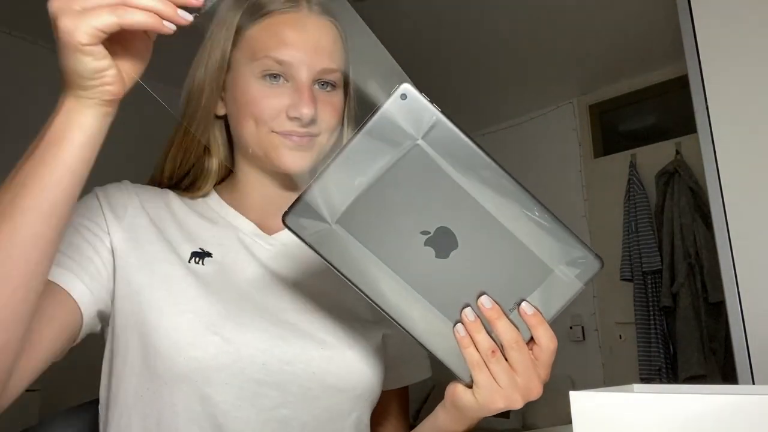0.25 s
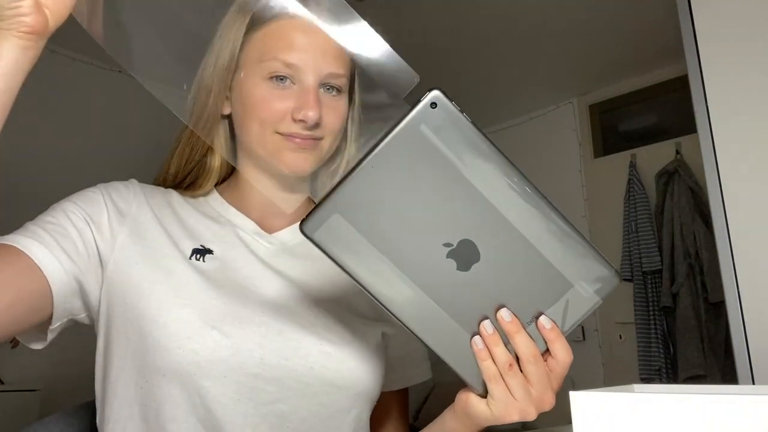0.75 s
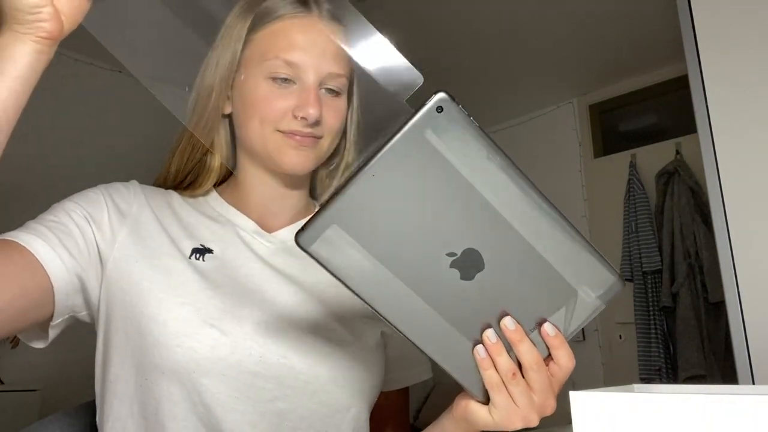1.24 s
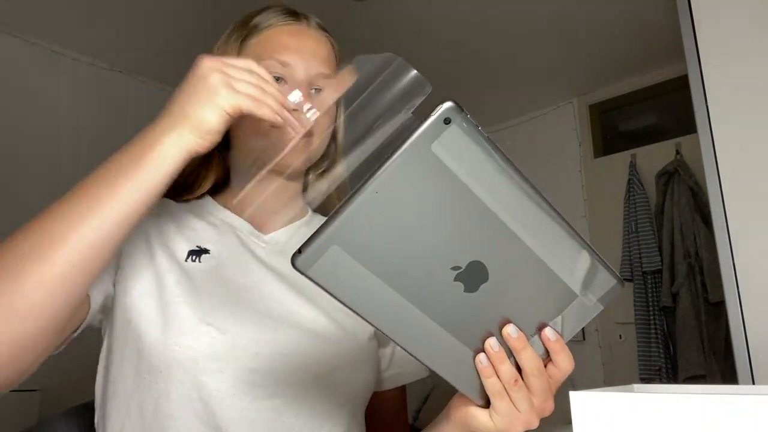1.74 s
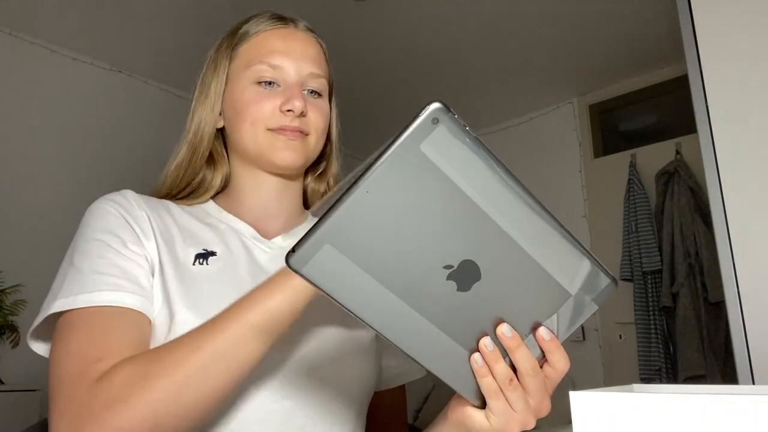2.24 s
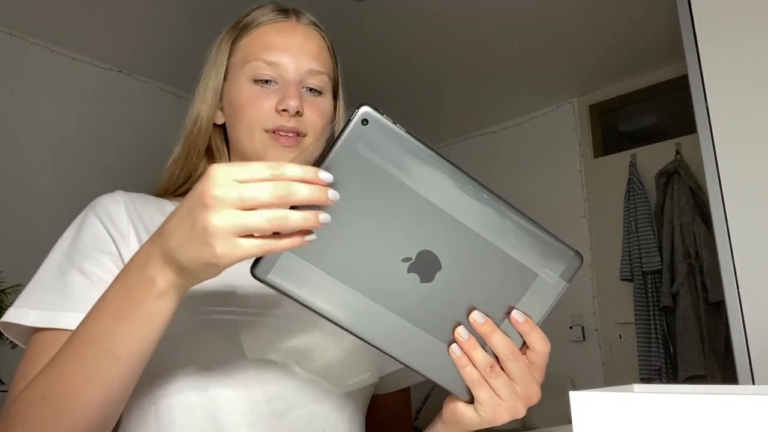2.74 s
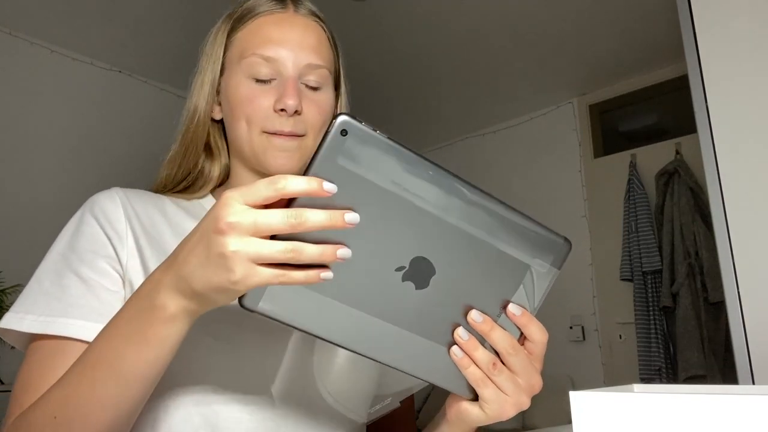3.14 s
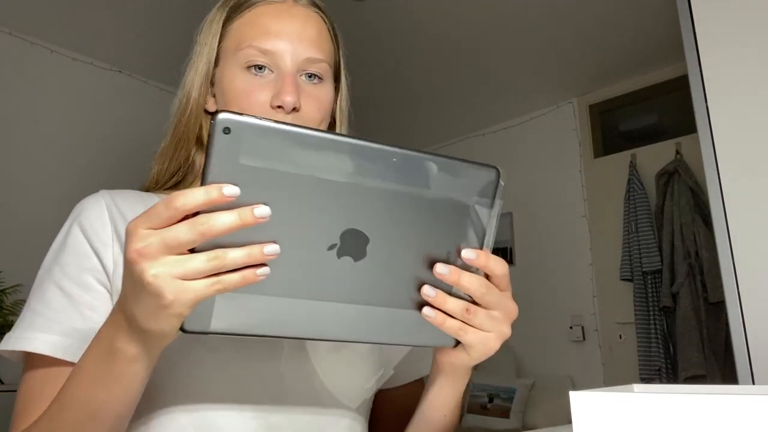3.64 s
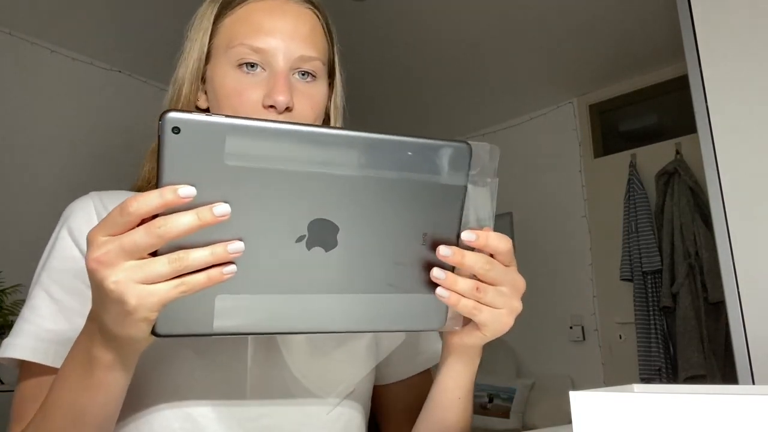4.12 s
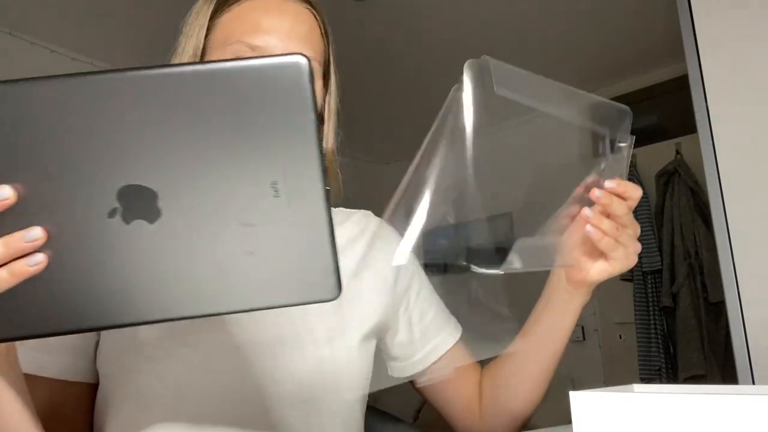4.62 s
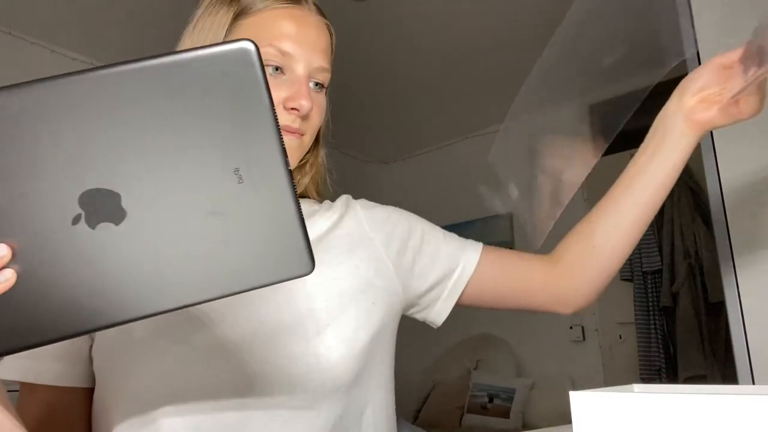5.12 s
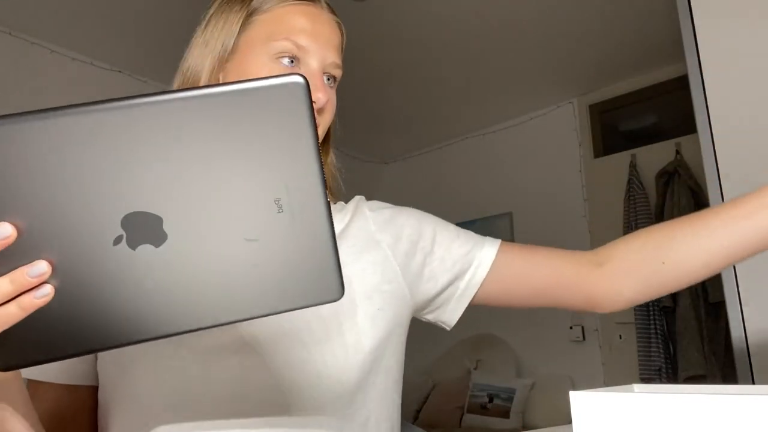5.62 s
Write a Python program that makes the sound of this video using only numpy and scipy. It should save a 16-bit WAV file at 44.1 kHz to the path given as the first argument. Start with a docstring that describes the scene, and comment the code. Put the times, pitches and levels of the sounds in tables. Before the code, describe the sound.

A dry, bright hiss of film on a smooth casing opens the scene and bursts into a sharp, booming crackle. Fingers then handle the sheet quietly: little pops, knocks, rustles. Short pushing scrapes build until the wrapper slips off with a thin sizzle, and loose plastic crackles off to the right. Close stereo pickup, small indoor room, faint steady air.

```python
"""A thin plastic wrapper is pulled off a tablet in a small room, close to the microphone.
Over quiet air, the film first hisses along the casing: a dense stream of tiny random slips, given a colour.
It flaps free with a loud crackle (a burst of many slips) and a boom (low fading swings). Handling then brings
single snaps (a noisy crack and a pitched pop), crinkles, taps and pushes of the casing in its sleeve. At last
the casing leaves the other end with a sizzle, the film slips free and is tossed aside, still crinkling."""
import sys
import numpy as np
from scipy import signal
from scipy.fft import rfft, irfft, next_fast_len
from scipy.io import wavfile
from scipy.ndimage import uniform_filter1d, map_coordinates

SR = 44100
rng = np.random.default_rng(int(sys.argv[2]) if len(sys.argv) > 2 else 0)


def generate_wav(sig):
    """Save sig (samples, or channels by samples) to the path in sys.argv[1] as 16-bit PCM at SR."""
    pcm = np.round(np.clip(np.atleast_2d(sig).T, -1, 1) * 32767).astype(np.int16)
    wavfile.write(sys.argv[1], SR, pcm)


N = 258588
TIME = np.arange(N) / SR

# Colour of the quiet air: pitch_hz, level_db
AIR_COLOUR = [(20, -33), (45, 5.5), (100, -6), (350, -15), (520, -20.5), (4000, -35.5), (13500, -35),
              (15000, -48.5)]
# Colours of film on casing, and of casing inside the sleeve: pitch_hz, level_db
HISS_COLOUR = [(100, -4.5), (400, -6.5), (500, -8), (720, 0), (960, -6.5), (1290, -12.5), (1900, 1),
               (3000, -10.5), (4300, -0.5), (5100, -5.5), (7500, -1.5), (14000, -11), (15200, -39.5)]
SLEEVE_COLOUR = [(150, -17), (350, -4.5), (600, 8.5), (1100, -6.5), (1800, 2), (5000, 3), (9000, 7),
                 (14000, 2), (15200, -24)]
# The film scrapes over an end of the casing: start_s, length_s, level_db (before the swell)
PULLS = [(-.05, .61, -47), (4.447, 0.082, -47.5)]
# The casing slides along inside the sleeve: start_s, length_s, level_db (before the swell)
PUSHES = [(1.378, 0.039, -58), (1.539, 0.079, -65), (2.332, 0.045, -69.5), (3.107, 0.16, -67),
          (3.475, 0.14, -59.5), (3.615, 0.08, -47), (3.73, 0.226, -66), (3.936, 0.278, -45.5),
          (4.198, 0.074, -47), (4.29, 0.2, -43)]
# The end of the casing leaves the sleeve, a thin sizzle: start_s, length_s, level_db (before the swell)
SIZZLE = (4.235, 0.074, -40.5)
# Low rumbles as the grip drags: start_s, length_s, level_db (before the swell)
DRAGS = [(0.224, 0.15, -59), (3.348, 0.17, -59)]
# The whole sheet booms as it flaps free: pitch_hz, level_db (before the shiver), t60_s (time to fall 60 dB)
FLAP_BOOM = [(61.3, -18.5, 0.24), (134.7, -25, 0.3), (203, -29, 0.36), (253.4, -30, 0.47)]
# Dull knocks of hands and casing: start_s, level_db (before the shiver), settled pitch_hz
KNOCKS = [(0.585, -35, 131), (.834, -38.5, 124.7), (1.622, -37, 79.7), (2.009, -34, 240), (2.656, -40, 100),
          (2.702, -50, 111), (3.696, -51.5, 182), (4.219, -27.5, 200.3)]
# The sheet buckles: start_s, pop level_db, crack_db (relative to the pop), average pop pitch_hz
SNAPS = [(0.5846, -41.5, 1.5, 705), (.601, -55.5, 15, 815), (.658, -39, 1, 556), (1.397, -75.5, -6.5, 1450),
         (1.481, -82.5, -9, 4310), (1.6183, -57.5, 1, 636), (1.6285, -55.5, -16, 695),
         (1.6806, -61, 1, 810), (2.0075, -49.5, -5.5, 613), (2.011, -52, -2, 444),
         (2.063, -63.5, -20, 1780), (2.198, -68.5, -0.5, 1060), (2.912, -81, -9, 4470),
         (3.48, -78, -4.5, 657), (3.4965, -88, 11, 2470), (3.542, -73.5, -8, 1740),
         (3.647, -74.5, 8.5, 770), (3.69, -69.5, -3, 740), (3.7, -62, -14.5, 672), (3.793, -74, 4, 634),
         (3.9428, -75.5, 10, 2500), (3.9517, -48.5, -3.5, 1271), (4.206, -54.5, -22, 720),
         (4.215, -46, -5.5, 670), (4.353, -60.5, -9, 1300), (4.935, -71.5, -16, 3240), (5.559, -77, 0, 695),
         (5.639, -53, -16, 2760), (5.651, -57, 11, 1450), (5.722, -50, -4.5, 2490), (5.843, -59, -8, 830)]
# Colour of a snap's crack: pitch_hz, level_db
CRACK_COLOUR = [(200, -9.5), (1000, -3), (2500, 5), (5000, -1.5), (9000, 0.5), (13000, -6), (16000, -12.5)]
# The film is stretched over the casing: start_s, end_s
TAUT_SPAN = (3.4, 4.4)
# Many creases give way together: start_s, length_s, crackle_db, flutter_db
CRUMPLES = [(.587, 0.033, -38.5, -28.5), (0.6388, 0.033, -19.5, -20.5), (0.915, 0.022, -66, -55.5),
            (1.622, 0.018, -51, -33.5), (2.013, 0.026, -53.5, -56), (2.197, 0.045, -59, -61),
            (4.214, 0.021, -59, -44), (4.291, 0.203, -60.5, -55.5), (4.512, 0.011, -48.5, -58),
            (4.931, 0.037, -70, -64.5), (5.627, 0.038, -42.5, -42.5), (5.679, 0.066, -54, -52.5),
            (5.797, 0.022, -50.5, -50)]
# Colours of the crackling creases and the fluttering sheet: pitch_hz, level_db
CRACKLE_COLOUR = [(150, -36), (600, 3), (1300, -9.5), (2200, -1.5), (4200, -2), (8000, -5.5), (12000, -8.5),
                  (14300, -19.5), (15500, -40.5)]
FLUTTER_COLOUR = [(40, -14), (110, 3), (215, 6), (380, -3), (600, 0), (1000, -6), (1500, -15),
                  (4000, -54.5)]
# A hard object close by is jolted: start_s, level_db
JOLTS = [(.66, -55), (2.01, -72.5), (2.88, -65), (4.87, -67)]
# Soft taps and dull crinkles under the fingers: start_s, level_db, pitch_hz
TAPS = [(1.343, -76.5, 1000), (1.809, -72.5, 941), (1.867, -73.5, 1630), (2.459, -68.5, 1578),
        (2.472, -65, 783), (2.786, -68.5, 750), (2.848, -75, 1210), (2.903, -71, 784), (4.32, -62.5, 780),
        (4.952, -66, 1157), (5.279, -79, 2250), (5.365, -78, 1376)]
# Fingers shift and the loose sheet sways: middle_s, half_length_s, level_db, resonance pitch_hz
RUSTLES = [(1.409, 0.033, -61, 450), (1.597, 0.023, -63.5, 897), (1.898, 0.099, -59.5, 304),
           (2.048, 0.04, -51.5, 3600), (2.224, 0.033, -51, 1560), (2.429, 0.14, -65.5, 677),
           (2.867, 0.065, -58, 411), (3.221, 0.18, -74, 595.5), (4.276, 0.065, -53, 299),
           (4.556, 0.038, -56, 175.7), (4.871, 0.037, -65, 335.4), (5.68, 0.045, -42, 1400),
           (5.79, 0.036, -48.5, 1020)]
# Colour of the broad part of a rustle: pitch_hz, level_db
RUSTLE_COLOUR = [(100, 10.5), (380, 10.5), (800, -0.5), (2500, -8), (10000, -42)]
# How long the room rings: pitch_hz, t60_s (time to fall 60 dB)
ROOM_FADE = [(100, 0.21), (300, 0.37), (1000, 0.26), (4000, 0.28), (8000, 0.25), (15000, 0.075)]
# How alike left and right are in sound from all sides: pitch_hz, likeness (-1 opposite, 1 the same)
LIKENESS = [(120, .99), (230, .9), (400, .2), (600, -.6), (1100, .2), (1600, 0), (5500, 0), (8000, .7)]
# Extra lead of the side nearer to the source: pitch_hz, lead_radians
NEAR_LEAD = [(260, 0), (345, .7), (430, 1.5), (600, 3.6), (860, 4.8), (1050, 5.9), (1300, 6.8),
             (2000, 6.28)]
# The recorder turns the treble of left against right, whatever its direction: pitch_hz, turn_radians
TREBLE_TURN = [(5000, 0), (6600, 1.4), (8000, 0), (10500, -3.14), (13200, -6.28), (15000, -9.42)]

# Movements: onset, time to fall 60 dB afterwards, and how much each kind grows
ATTACK_S, RELEASE_T60_S, PULL_SWELL_DB, PUSH_SWELL_DB = 0.014, 0.017, 1.5, 4
# The film's free end: starting pitch, rise as a share of it, band width, level relative to the pull
EDGE_HZ, EDGE_RISE, EDGE_WIDTH_HZ, EDGE_DB = 2300, 0.4, 350, -17
SIZZLE_LOW_HZ = 8100
DRAG_HZ, DRAG_WAVER_HZ = 50, 7.6
FLAP_S = 0.653  # the film comes free of the first end
KNOCK_T60_S = 0.11
KNOCK_SAG, KNOCK_SAG_S = 0.86, 0.0042  # starts sharp by this share of its pitch, then falls to it
SHIVER_DB = 6.5  # the swings of the limp sheet are uneven
TAUT_ROOM_DB, LOOSE_ROOM_DB = -8.5, -5
CREASE_HOLD_S, CREASE_T60_S = 0.001, 0.009
POP_HOLD_S, POP_T60_S = 0.0025, 0.009  # a flipping facet swings for a moment and is damped at once
RING_HZ, RING_T60_S = 394, 1.2
TAP_T60_S, TAP_WIDTH = 0.05, 0.8  # width relative to the pitch
RUSTLE_WIDTH = 1.4  # relative to the resonance pitch
RUSTLE_BODY_DB, FIZZ_DB = 0.5, -21.5  # broad rustle relative to the resonance; fizz relative to the rustle
TOSS_S = 4.8
LEAD_TOP_HZ = 3000  # the plain time lead fades out above this
TOP_HZ = 16300


def amp(db):
    """Turns decibels into a gain."""
    return 10 ** (np.asarray(db) / 20)


def unit(x):
    """Scales x to an average strength (rms) of 1."""
    return x / np.sqrt(np.mean(x ** 2) + 1e-20)


def along(points, hz):
    """Reads a curve of (pitch_hz, value) points, with pitch on a log axis."""
    f, v = np.transpose(points)
    return np.interp(np.log(hz + 1), np.log(f + 1), v)


def filtered(x, response):
    """Changes the strength and phase of each frequency in x."""
    size = x.shape[-1]
    padded = next_fast_len(size + 8192)
    spectrum = rfft(x, padded) * response(np.fft.rfftfreq(padded, 1 / SR))
    return irfft(spectrum, padded)[..., :size]


def coloured(x, colour):
    """Gives x a colour, at rms 1."""
    return unit(filtered(x, lambda hz: amp(along(colour, hz))))


def resonance(x, hz, width):
    """Rings x through a steep-sided resonance at hz, at rms 1; width is relative to hz."""
    def response(f):
        return (1j * f * hz / (hz * hz - f * f + 1j * width * f * hz)) ** 2
    return unit(filtered(x, response))


def add(track, s, x):
    """Mixes x into the track from time s."""
    start = max(round(s * SR), 0)
    part = track[..., start:start + x.shape[-1]]
    part += x[..., :part.shape[-1]]


def grains(size, rate, spread_db):
    """Makes tiny slips at random moments, rate a second on average, with mixed sizes."""
    hit = rng.random(size) < rate / SR
    sign = rng.choice([-1, 1], size)
    return hit * sign * amp(spread_db * np.clip(rng.standard_normal(size), -2, 2))


def wobble(rate, size=N):
    """Draws a smooth random curve through rate random points a second."""
    knots = rng.standard_normal(int(size * rate / SR) + 4)
    return map_coordinates(knots, [TIME[:size] * rate])


def gesture(start, length, db, swell_db):
    """Level of a movement: it sets in, changes by swell_db to end at db - 1.5 swell_db, and dies away."""
    t = TIME - start
    swell = swell_db * (np.clip(t / length, 0, 1) - 2.5)
    release = -60 * np.maximum(t - length, 0) / RELEASE_T60_S
    return np.clip(t / ATTACK_S, 0, 1) * amp(db + swell + release)


def diffuse(pair):
    """Blends two unrelated signals into sound from all sides, with a set left-right likeness at each pitch."""
    def blend(hz):
        turn = np.arccos(np.clip(along(LIKENESS, hz), -1, 1)) / 2
        return np.array([np.cos(turn), np.sin(turn)])
    mid, side = filtered(pair, blend)
    return np.array([mid + side, mid - side])


def placed(x, room_db, lead_ms):
    """Direct sound leads on one side (left for a positive lead); the walls answer with a fading wash."""
    def both_sides(hz):
        delay = np.pi * hz * lead_ms / 1000 / (1 + (hz / LEAD_TOP_HZ) ** 8)
        phase = delay + np.sign(lead_ms) * along(NEAR_LEAD, hz) / 2
        return np.exp(1j * phase * np.array([[1], [-1]]))
    direct = filtered(x, both_sides)
    # the wash is noise that fades at its own speed at each pitch
    hz, t, noise = signal.stft(rng.standard_normal((2, SR // 2)), SR, nperseg=256)
    fade = amp(-60 * t / along(ROOM_FADE, hz)[:, None])
    tail = signal.istft(noise * fade, SR, nperseg=256)[1]
    tail = diffuse(tail * (1 - np.exp(-TIME[:tail.shape[1]] / 0.000087)))
    tail = tail / np.linalg.norm(tail[0])
    walls = signal.fftconvolve(x[None], tail, axes=1)[:, :len(x)]
    return direct + amp(room_db) * walls


def lead_at(s):
    """Lead of the left side in ms: film on the left, near the middle from when it is taut, tossed to the right."""
    if s < TAUT_SPAN[0]:
        return 0.2
    return 0.02 if s < TOSS_S else -0.2


def room_tone():
    """Quiet air in the room: steady coloured noise from all sides."""
    air = coloured(rng.standard_normal((2, N)), AIR_COLOUR)
    return amp(-68.5) * unit(diffuse(air))


def patchy(x, depth_db):
    """The contact patch changes shape, so bands swell and fade on their own."""
    bands = signal.stft(x, nperseg=512)[2]
    field = uniform_filter1d(rng.standard_normal(bands.shape), size=7, axis=0)  # smooth over pitch
    field = uniform_filter1d(field, size=12, axis=1)  # smooth over time
    return unit(signal.istft(bands * amp(depth_db * unit(field)), nperseg=512)[1][:N])


def stroke(level, colour):
    """Dense micro-slips of film on metal merge into a hiss; the grip varies unevenly."""
    grip_db = unit(filtered(rng.standard_normal(N), lambda hz: np.exp(-hz / 40)))
    slips = patchy(grains(N, rate=3800, spread_db=3.5), depth_db=1.5)
    return level * amp(grip_db) * coloured(slips, colour)


def edge(start, length, db):
    """The film's free end rushes in a narrow band that rises as less of it is left on the casing."""
    hz = EDGE_HZ * (1 + EDGE_RISE * np.clip((TIME - start) / length, 0, 1))
    band = filtered(rng.standard_normal(N), lambda f: np.exp(-(f / EDGE_WIDTH_HZ) ** 2))
    # low noise times a tone becomes a band around the tone
    rush = unit(band * np.cos(2 * np.pi * np.cumsum(hz) / SR))
    return gesture(start, length, db + EDGE_DB, PULL_SWELL_DB) * rush


def slide():
    """Film is pulled off the first end, the casing is pushed out of the rest, and the last end slips free."""
    pulls = stroke(sum(gesture(*pull, PULL_SWELL_DB) for pull in PULLS), HISS_COLOUR)
    pulls = pulls + sum(edge(*pull) for pull in PULLS)
    pushes = stroke(sum(gesture(*push, PUSH_SWELL_DB) for push in PUSHES), SLEEVE_COLOUR)
    treble_only = signal.butter(2, SIZZLE_LOW_HZ, "high", fs=SR, output="sos")
    sizzle = signal.sosfilt(treble_only, stroke(gesture(*SIZZLE, PULL_SWELL_DB), SLEEVE_COLOUR))
    near_left = placed(pulls, room_db=0.0, lead_ms=0.2)
    return near_left + placed(pushes + sizzle, room_db=-0.5, lead_ms=0.037)


def swing(hz, db, t60, sag=0):
    """A low, softly starting swing that shivers as it dies away; its pitch may sag at first."""
    t = TIME[:SR // 2]
    cycles = hz * (t + sag * KNOCK_SAG_S * (1 - np.exp(-t / KNOCK_SAG_S)))
    level_db = db - 60 * t / t60 + SHIVER_DB * wobble(45, size=len(t))
    soft_start = 1 - np.exp(-t / 0.0016)
    return np.sin(2 * np.pi * cycles) * amp(level_db) * soft_start * (1 - t / t[-1])


def thumps():
    """Low swings: the rumble of a dragging grip, knocks of the hands and casing, the boom of the flapping sheet."""
    judder = np.sin(2 * np.pi * np.cumsum(DRAG_HZ + DRAG_WAVER_HZ * wobble(42)) / SR)
    out = unit(judder) * sum(gesture(*drag, swell_db=-3.5) for drag in DRAGS)
    for s, db, hz in KNOCKS:
        add(out, s, swing(hz, db, KNOCK_T60_S, KNOCK_SAG))
    add(out, FLAP_S, sum(swing(*mode) for mode in FLAP_BOOM))
    return placed(out, room_db=-8.0, lead_ms=0.15)


def snap(hz, crack_db):
    """A facet flips: a bright crack, and a pop of a few uneven swings around the facet's own pitch."""
    t = TIME[:SR // 3]

    def burst(hold, t60):
        return amp(-60 * np.maximum(t - hold, 0) / t60)
    # the crease runs for a moment, then the sheet shivers faintly
    run = burst(CREASE_HOLD_S, CREASE_T60_S) + amp(-25.0 - 60 * t / 0.14)
    crack = coloured(rng.standard_normal(len(t)) * run, CRACK_COLOUR)
    cycles = hz * np.cumsum(np.exp(0.4 * wobble(2 * hz, size=len(t)))) / SR
    pop = np.sin(2 * np.pi * cycles) * burst(POP_HOLD_S, POP_T60_S)
    # smaller wrinkles add fading noise around the same pitch
    wrinkles = resonance(rng.standard_normal(len(t)) * amp(-60 * t / 0.023), hz, width=2.6)
    return unit(unit(pop) + 0.55 * wrinkles) + amp(crack_db) * crack


def snaps():
    """Single buckles: drier while the film is taut and faces the microphone, roomier on the loose sheet."""
    out = np.zeros((2, N))
    for s, db, crack_db, hz in SNAPS:
        taut = TAUT_SPAN[0] < s < TAUT_SPAN[1]
        room_db = TAUT_ROOM_DB if taut else LOOSE_ROOM_DB
        add(out, s, placed(amp(db) * snap(hz, crack_db), room_db, lead_at(s)))
    return out


def crumples():
    """An avalanche of creases crackles while the loose sheet flutters."""
    out, t = np.zeros((2, N)), TIME[:SR * 3 // 4]
    for s, length, crackle_db, flutter_db in CRUMPLES:
        release = amp(-60 * np.maximum(t - length, 0) / 0.035)
        # the harder the sheet is crushed, the more creases flip each second
        creases = grains(len(t), rate=7000 * amp(crackle_db / 4), spread_db=2.5)
        crackle = coloured(creases, CRACKLE_COLOUR) * np.minimum(t / length * 10, 1)
        flutter = coloured(rng.standard_normal(len(t)), FLUTTER_COLOUR) * (1 - np.exp(-t / 0.015))
        crumple = release * (amp(crackle_db) * crackle + amp(flutter_db) * flutter)
        add(out, s, placed(crumple, room_db=-7.0, lead_ms=lead_at(s)))
    return out


def ringing():
    """A jolted hard object rings on: one faint, slowly fading note after each jolt."""
    out, t = np.zeros(N), TIME[:2 * SR]
    for s, db in JOLTS:
        level = amp(db - 60 * t / RING_T60_S) * np.minimum(t / ATTACK_S, 1)
        add(out, s, level * np.sin(2 * np.pi * RING_HZ * t))
    return out


def taps():
    """A fingertip dents the film: a short, soft burst in the resonance of the touched patch."""
    out, t = np.zeros(N), TIME[:SR // 8]
    for s, db, hz in TAPS:
        burst = rng.standard_normal(len(t)) * amp(-60 * t / TAP_T60_S)
        add(out, s, amp(db) * resonance(burst, hz, TAP_WIDTH))
    return placed(out, room_db=-7, lead_ms=0.18)


def handling():
    """Each finger shift is a swell of soft slips that ring the held patch of film, with a little fizz on top."""
    out, t = np.zeros((2, N)), TIME[:SR] - 0.5
    for s, half, db, hz in RUSTLES:
        slips = grains(len(t), rate=450, spread_db=4.5)
        fizz = coloured(grains(len(t), rate=1500, spread_db=3), SLEEVE_COLOUR)
        body = amp(RUSTLE_BODY_DB) * coloured(slips, RUSTLE_COLOUR)
        soft = unit(resonance(slips, hz, RUSTLE_WIDTH) + body)
        swell = amp(db) * np.exp(-(t / half) ** 2)
        rustle = swell * (soft + amp(FIZZ_DB) * fizz)
        add(out, s + t[0], placed(rustle, room_db=-2.5, lead_ms=lead_at(s)))
    return out


def scene():
    """Adds up the room, the film and the hands."""
    film = slide() + snaps() + crumples()
    hands = thumps() + taps() + handling()
    return room_tone() + film + hands + ringing()


def record(dry):
    """The recorder rounds off high peaks, cuts deep bass, turns the treble of the sides and limits the band."""
    held = dry / (1 + np.abs(dry / 0.65) ** 6) ** (1 / 6)  # peaks level off towards 0.65
    held = signal.sosfilt(signal.butter(4, 38, "high", fs=SR, output="sos"), held)

    def turn(hz):
        return np.exp(0.5j * along(TREBLE_TURN, hz) * np.array([[1], [-1]]))

    def band_limit(hz):
        return amp(along([(14000, 0), (16000, -12)], hz)) * (hz < TOP_HZ)
    return filtered(filtered(held, turn), band_limit)


dry = scene()
out = record(dry)
generate_wav(out)
```